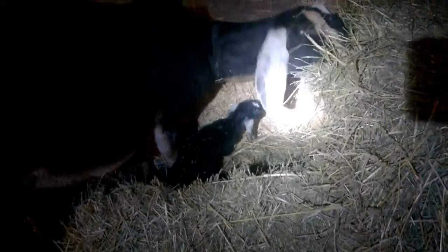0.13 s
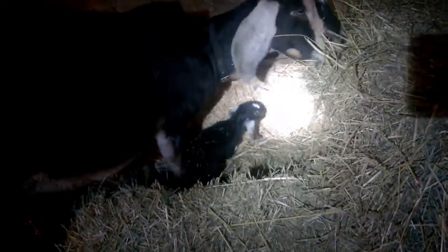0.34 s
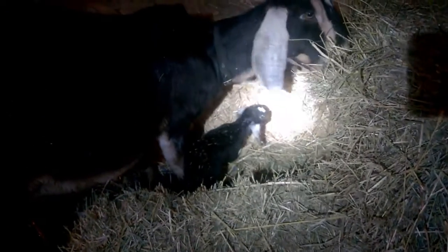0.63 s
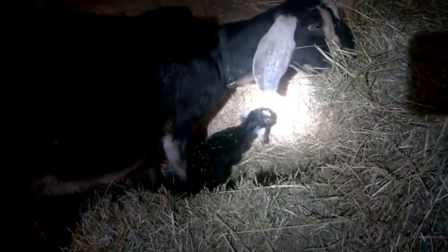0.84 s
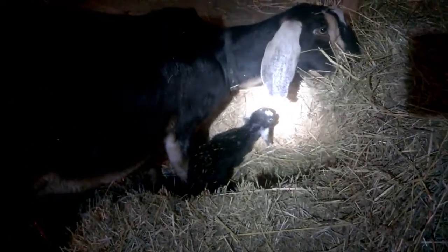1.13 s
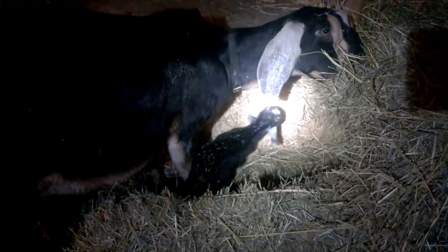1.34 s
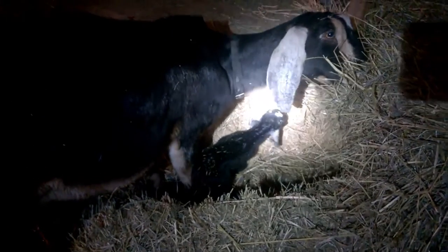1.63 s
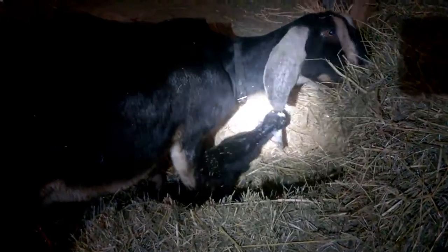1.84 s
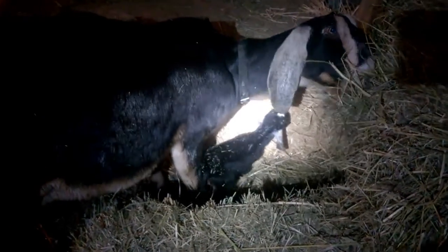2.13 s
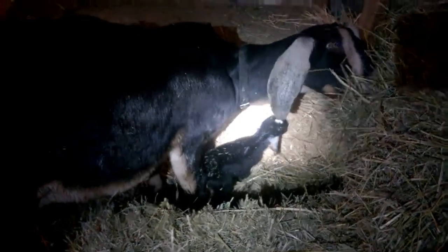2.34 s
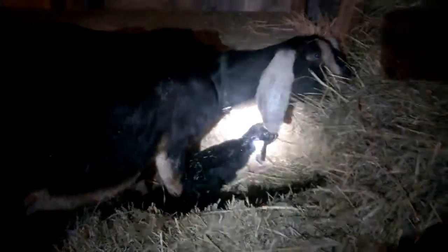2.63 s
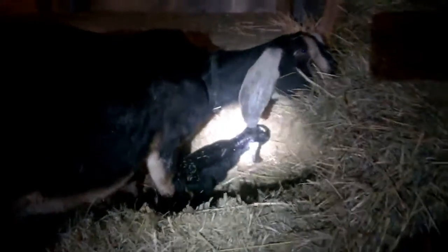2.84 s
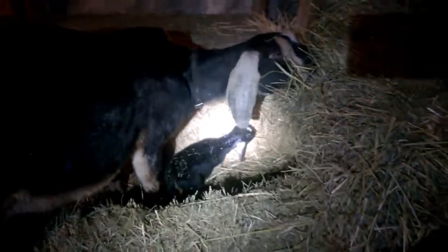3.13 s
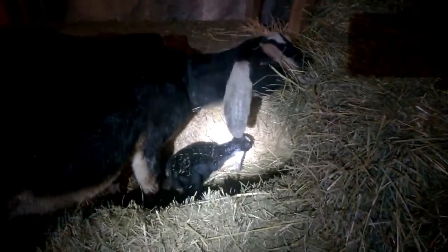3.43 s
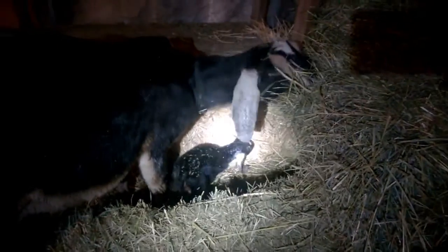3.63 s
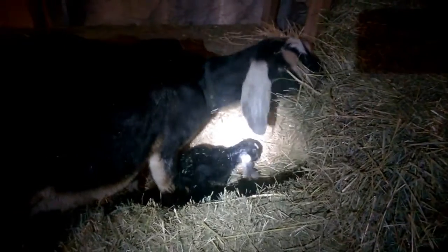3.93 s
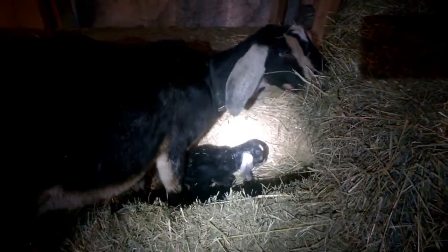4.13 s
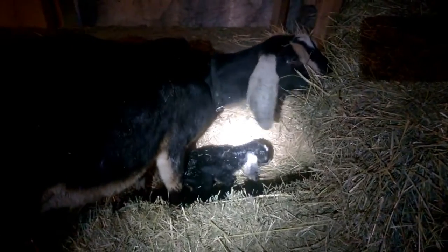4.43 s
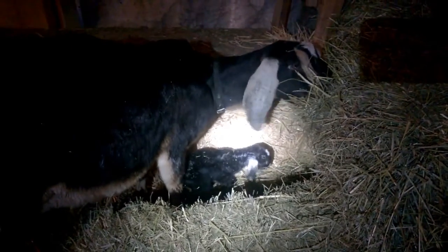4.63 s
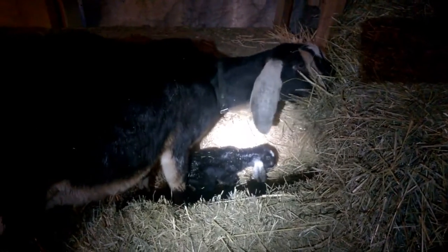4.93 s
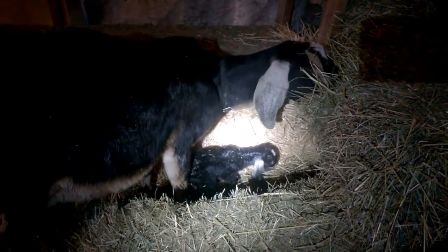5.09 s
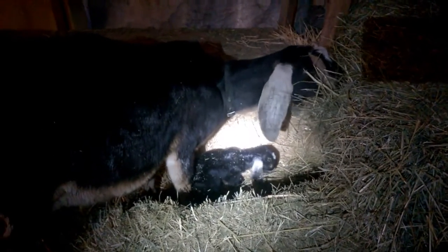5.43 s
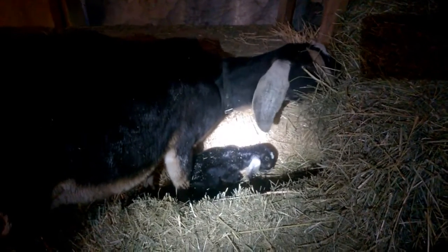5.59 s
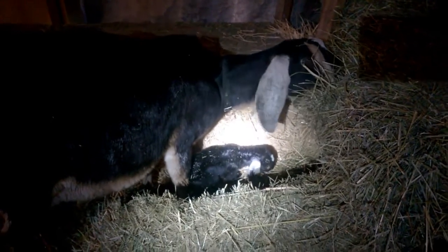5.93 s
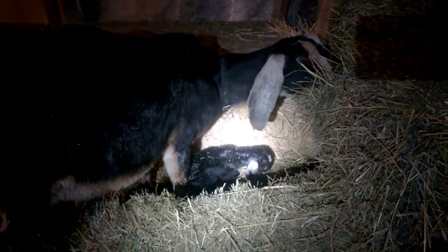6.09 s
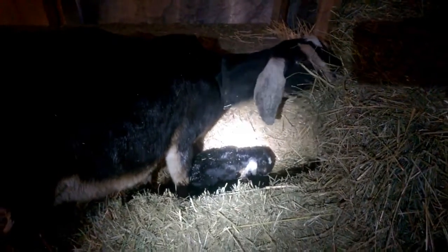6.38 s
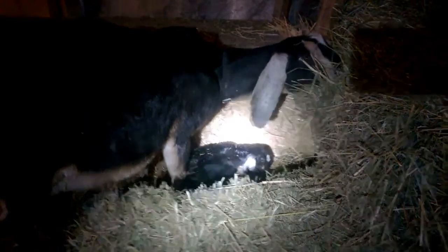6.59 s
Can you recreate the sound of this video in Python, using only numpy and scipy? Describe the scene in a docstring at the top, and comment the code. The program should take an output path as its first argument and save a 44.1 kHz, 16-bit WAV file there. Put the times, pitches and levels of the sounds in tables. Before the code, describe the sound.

Close in a quiet barn, a newborn goat kid bleats three times: a soft wavering cry, a shorter weak one, then a loud open-mouthed bleat. A hoarse, rooster-like crow sounds further off during the first two seconds. Hay rustles and snaps, straw is brushed, and small woody knocks and dull thuds mark the animals shifting. A faint low hiss continues throughout.

```python
"""Goat kid bleating in a barn

A newborn kid gives three quavering bleats, the last open-mouthed: harmonics and puffs of breath, coloured
by the mouth. Further off a hoarse, falling crow, like a rooster's: two gliding partials and a rasp of
resonant noise. Goats shift in the bedding: hay rustles and snaps (random grains), straw is swept (banded
noise), with knocks (decaying bursts) and soft thuds (low noise) over a faint steady hiss."""
import sys
import numpy as np
from scipy import signal
from scipy.fft import rfft, irfft, next_fast_len
from scipy.io import wavfile

SR = 44100
rng = np.random.default_rng(int(sys.argv[2]) if len(sys.argv) > 2 else 0)


def unload_wav(signal):
    """Save mono or channel-first audio to the path in sys.argv[1] as 16-bit WAV at rate SR, clipped to [-1, 1]."""
    wavfile.write(
        sys.argv[1],
        SR,
        np.round(np.clip(np.atleast_2d(signal).T, -1, 1) * 32767).astype(np.int16),
    )


N = 297675
TIME = np.arange(N) / SR


def from_db(db):
    """Decibels to gain."""
    return 10 ** (np.asarray(db) / 20)


def rms_one(x):
    """Scale to rms 1."""
    return x / np.sqrt(np.mean(x ** 2) + 1e-20)


def at_hz(points, hz):
    """Read a spectrum in dB on a log-frequency axis."""
    f, db = np.transpose(points)
    return np.interp(np.log(np.maximum(hz, 1)), np.log(f), db)


def coloured(x, spectrum):
    """Shape a signal by a spectrum; rms 1."""
    size = next_fast_len(N)
    gain = from_db(at_hz(spectrum, np.fft.rfftfreq(size, 1 / SR)))
    return rms_one(irfft(rfft(x, size) * gain, size)[:N])


def noise(spectrum):
    """Noise of a given colour, rms 1."""
    return coloured(rng.standard_normal(N), spectrum)


def drift(rate_hz, size=N):
    """Normal random values of spread 1, rate_hz a second, joined by straight lines."""
    return np.interp(np.arange(size) * rate_hz / SR, np.arange(size), rng.standard_normal(size))


def resonate(x, hz, width_hz):
    """Two-pole resonance, gain about 1 at its peak."""
    r = np.exp(-np.pi * width_hz / SR)
    b = np.array([1, 0, -1]) * (1 - r * r) / 2
    a = [1, -2 * r * np.cos(2 * np.pi * hz / SR), r * r]
    return signal.lfilter(b, a, x)


def bandpass(x, order, low_hz, high_hz):
    """Butterworth band-pass."""
    return signal.sosfilt(signal.butter(order, [low_hz, high_hz], "band", fs=SR, output="sos"), x)


def swell(s, half_s, t=TIME):
    """Bell of height 1 at time s, down to 1/e at half_s either side."""
    return np.exp(-np.minimum(((t - s) / half_s) ** 2, 50))


def held(start, end, attack_s, release_s, t):
    """Attack, hold at 1, release; the slopes cover 20 dB in the times given."""
    return from_db(-20 * np.clip(np.maximum((start - t) / attack_s, (t - end) / release_s), 0, 10))


def kid():
    """Three bleats, each with its own steadiness, breath and nasal dip."""
    # per bleat, one row per quaver: (crest [s], pitch [Hz], pitch arch half length [s], level [dB],
    # attack [s], release [s], mouth opening at crest [0-1])
    bleats = [
        [(1.095, 430, 0.047, -53, 0.037, 0.018, 0), (1.224, 532, 0.035, -50.5, 0.0228, .032, 0),
         (1.335, 564.4, 0.039, -43.5, 0.024, 0.026, 0.19), (1.465, 564, 0.039, -43.5, 0.038, .023, 0.25)],
        [(2.404, 417.3, .047, -52, 0.043, 0.029, 0), (2.44, 370.4, 0.0396, -60.5, 0.01, .018, 0.17),
         (2.52, 529.6, .031, -47, 0.022, 0.025, 0.21)],
        [(4.696, 438.2, 0.042, -47.5, .026, 0.023, 0), (4.796, 560, 0.038, -46, .028, 0.021, 0.06),
         (4.897, 623.5, .066, -40.5, 0.046, 0.045, 0.64), (5.006, 635.6, 0.063, -23, .024, 0.033, 0.93)],
    ]
    out = bleat(bleats[0], jitter=0.0074, shimmer=0.21, rasp_db=-17.5, bright_db_per_octave=0.5,
                dip_hz=5550, dip_width_hz=2100, dip_db=-6.5)
    out += bleat(bleats[1], jitter=0.011, shimmer=0.2, rasp_db=-12.5, bright_db_per_octave=0.44,
                 dip_hz=3500, dip_width_hz=540, dip_db=-9)
    out += bleat(bleats[2], jitter=0.0045, shimmer=0.06, rasp_db=-29.5, bright_db_per_octave=0.0,
                 dip_hz=3300, dip_width_hz=870, dip_db=-2)
    return out


def bleat(rows, jitter, shimmer, rasp_db, bright_db_per_octave, dip_hz, dip_width_hz, dip_db):
    """Harmonics whose pitch arches with each quaver; the opening mouth moves the weight up to 1.9 kHz."""
    # throat and nose with lips shut, half open, wide open: (frequency [Hz], level [dB])
    mouths = ([(400, -6), (560, -9.5), (870, 0), (1300, -8.5), (1700, -7.5), (2150, -14), (2750, -30),
               (3450, -24), (4000, -19), (5250, -18), (6500, -21), (7700, -50), (8950, -35), (9700, -44),
               (14000, -51)], [(580, 1), (1150, 5), (1550, -17), (1850, -3.5), (2350, 6.5), (3100, -6.5),
                             (3900, -10.5), (4500, -13), (5400, -31), (6250, -8.5), (7400, -35),
                             (8200, -40), (9050, -27), (9900, -39), (14000, -50)], [(620, -38.5), (1290, -20), (1690, -1.5), (1920, 1),
                                           (2200, -28.5), (2550, -16.5), (3800, -19), (4450, -23.5),
                                           (5100, -20), (5750, -27.5), (6400, -26.5), (7400, -34.5),
                                           (8500, -55), (11000, -45.5), (14500, -80)])
    waver_db = 2.6
    inside = (TIME > rows[0][0] - .12) & (TIME < rows[-1][0] + .09)
    t = TIME[inside]
    pitch_hz, level, opening, rough = quavers(rows, t)
    pitch_hz = pitch_hz * (1 + jitter * rough * drift(500)[inside])
    phase = 2 * np.pi * np.cumsum(pitch_hz) / SR
    k = np.arange(1, 33)[:, None]
    hz = k * pitch_hz
    shares = [np.interp(opening, [0, .5, 1], corner) for corner in np.eye(len(mouths))]
    throat_db = sum(share * at_hz(mouth, hz) for share, mouth in zip(shares, mouths))
    throat_db += bright_db_per_octave * np.log2(hz / 1000)
    # the side branch of the nose swallows one band
    throat_db += dip_db * np.exp(-((hz - dip_hz) / dip_width_hz) ** 2)
    # the young folds never close twice alike: each harmonic wavers by itself
    waver = np.array([drift(55.1, size=SR)[:len(t)] for _ in k])
    gains = from_db(throat_db + waver_db * waver)
    gains /= np.sqrt(np.sum(gains ** 2, axis=0) / 2)
    # the winding throat delays each harmonic differently
    lag = 2 * np.pi * rng.random(k.shape)
    voice = np.sum(gains * np.cos(k * phase - lag), axis=0)
    voice *= 1 + shimmer * rough * drift(300)[inside]
    # air escapes in a puff at every opening of the folds
    air = sum(share * noise(mouth)[inside] for share, mouth in zip(shares, mouths)) * (1 + np.cos(phase))
    out = np.zeros(N)
    out[inside] = level * (voice + from_db(rasp_db) * rough * air)
    return out


def quavers(rows, t):
    """Each push arches the pitch, swells the level and frays as it gives out; the strongest push leads."""
    pitch_sag, fall_share = 0.28, 0.77  # share of pitch lost far from the crest; fall time / rise time
    mouth_opens_per_s = 3.4
    attack_bend, release_bend = 1.25, 2.7  # 1 = straight in dB
    fray_db = 11.5  # rise in roughness over one release
    crest, top_hz, arch_s, level_db, attack_s, release_s, mouth = np.transpose(rows)[:, :, None]
    age = t - crest
    rise = np.abs(age / attack_s) ** attack_bend
    fall = np.abs(age / release_s) ** release_bend
    fade = np.where(age < 0, rise, fall)
    power = from_db(level_db - 10 * np.minimum(fade, 20)) ** 2
    lead = power / power.sum(axis=0)
    arch = swell(crest, arch_s * np.where(age < 0, 1, fall_share), t)
    pitch_hz = top_hz * (1 - pitch_sag * (1 - arch))
    opening = np.clip(mouth + mouth_opens_per_s * age, 0, 1)
    rough = from_db(fray_db * np.clip(age / release_s, 0, 1) ** 2)
    pitch_hz, opening, rough = np.sum(lead * [pitch_hz, opening, rough], axis=1)
    return pitch_hz, np.sqrt(power.sum(axis=0)), opening, rough


def echoes(x):
    """Near boards and floor favour some harmonics and cancel others as the pitch moves."""
    # reflections: (delay [s], level [dB])
    reflections = [(.0023, -26), (.0061, -15), (0.0144, -12.5)]
    return x + sum(from_db(db) * np.interp(TIME - delay_s, TIME, x, left=0) for delay_s, db in reflections)


def crow(jitter=0.0059, hoarse_jitter=0.01686, flutter_db=2.0, waver_db=3.5, dull_hz=2050):
    """A thin note of two partials, unsteady where a rattling, dulled rasp joins it."""
    # clear notes: (start [s], end [s], first pitch [Hz], last pitch [Hz], fundamental [dB], octave [dB])
    notes = [(.27, .33, 610, 624, -61.5, -65), (0.388, 0.433, 607.7, 597, -74.5, -60),
             (.605, 0.641, 867, 857.2, -53, -51), (.675, 0.711, 866, 856, -54, -47.5),
             (0.731, 0.762, 840, 826, -60, -56), (0.796, 0.793, 832, 830, -50.5, -41.5),
             (0.832, 0.962, 865, 887, -56.5, -58), (1.028, 1.117, 792, 776, -64, -57),
             (1.47, 1.501, 872.7, 868, -62, -65.5), (1.528, 1.55, 866, 858, -64.5, -50),
             (1.576, 1.67, 837.3, 802.6, -65.5, -50), (1.729, 1.8, 784.3, 735.4, -73, -48),
             (1.821, 1.871, 718, 696, -78, -62)]
    # hoarse stretches: (start [s], end [s], level [dB])
    rasps = [(0.291, 0.433, -53.5), (0.585, 0.611, -53.5), (0.718, 0.943, -54.5), (0.956, 1.123, -51),
             (1.377, 1.46, -54), (1.783, 1.81, -54.5)]
    # throat resonances of the rasp: (frequency [Hz], width [Hz], level before rms scaling [dB])
    rasp_modes = [(670, 250, -6), (696, 45, 4), (860, 110, -7.5), (1127, 143, -1), (1479, 130, 7.5),
                  (1730, 38, 0.5), (1870, 32, 5.5)]
    note_attack_s, note_release_s = 0.015, 0.05
    rasp_attack_s, rasp_release_s = 0.038, 0.11
    glide_bend = 1.09  # 1 = even glide, above = late
    t = TIME[TIME < notes[-1][1] + .5]
    rasp = np.max([from_db(db) * held(start, end, rasp_attack_s, rasp_release_s, t)
                   for start, end, db in rasps], axis=0)
    start, end, first_hz, last_hz, fundamental_db, octave_db = np.transpose(notes)[:, :, None]
    # one unbroken voice slides from each note into the next
    sounding = held(start, end, note_attack_s, note_release_s, t)
    progress = np.clip((t - start) / (end - start), 0, 1) ** glide_bend
    glides_hz = first_hz + (last_hz - first_hz) * progress
    pitch_hz = np.average(glides_hz, weights=sounding, axis=0)
    unsteady = jitter + hoarse_jitter * rasp / rasp.max()
    phase = 2 * np.pi * np.cumsum(pitch_hz * (1 + unsteady * drift(350)[:len(t)])) / SR
    note = sum(np.max(from_db(db) * sounding, axis=0) * np.sin(k * phase)
               for k, db in ((1, fundamental_db), (2, octave_db)))
    note, rasp = np.pad([note, rasp], ((0, 0), (0, N - len(t))))
    # the membranes flap chaotically and drive the throat in uneven bursts
    flaps = rng.standard_normal(N) * from_db(flutter_db * drift(160))
    throat = sum((-1) ** i * from_db(db) * resonate(flaps, hz, width_hz)
                 for i, (hz, width_hz, db) in enumerate(rasp_modes))
    throat = rms_one(bandpass(throat, 6, 480, dull_hz))
    return np.sqrt(2) * note * from_db(waver_db * drift(71.27)) + rasp * throat


def knocks(grit_db=-1.0, blow_db=22.5):
    """Each contact is a sharp blow and a dying gritty scuff: a thud, a woody ring and a crack of straw."""
    # contacts, levels ahead of the filters: (time [s], level [dB], thud [dB re level],
    # crack [dB re level], decay t60 [s])
    contacts = [(0.2, -65, -23, 18.5, 0.02), (0.831, -52.5, -11, -26, 0.12), (.886, -45.5, 2, -12, 0.14),
                (.899, -61, 8, -4, 0.17), (1.143, -50.5, -36, -7.5, 0.16), (1.798, -46.5, 0, -7, 0.13),
                (1.823, -59.5, 8, -0.5, 0.081), (1.844, -62.5, 12.5, -12, 0.11),
                (3.201, -54.5, 0.5, -19, 0.13), (3.219, -52.5, -2, -17, 0.039), (3.939, -60.5, -2, 2, .05),
                (4.021, -78, -5, 12, .04), (4.63, -56.5, 1.5, -19, 0.4), (4.861, -54, 2, -11, 0.043),
                (6.467, -65, 1, -2, 0.11), (6.573, -62, 1, -17, 0.14)]
    # woody ring: (frequency [Hz], width [Hz], relative level [dB])
    ring_modes = [(736, 1500, -14), (1500, 284, 0.5), (1612, 138, 1.5), (2280, 510, -11.5)]
    body, thud, crack = np.zeros((3, N))
    grit = rms_one(from_db(grit_db * drift(600)) * rng.standard_normal((3, N)))
    for s, level_db, thud_db, crack_db, t60_s in contacts:
        start = int(s * SR)
        age = TIME[:min(N - start, SR // 2)]
        span = slice(start, start + len(age))
        for layer, grains, db in zip((body, thud, crack), grit, (0, thud_db, crack_db)):
            layer[span] += from_db(level_db + db - 60 * age / t60_s) * grains[span]
            layer[start] += from_db(level_db + db + blow_db)
    ring = sum((-1) ** i * from_db(db + 19.5) * resonate(body, hz, width_hz)
               for i, (hz, width_hz, db) in enumerate(ring_modes))
    low = from_db(18) * resonate(resonate(thud, 418, 220), 520, 530)
    snap = bandpass(crack, 3, 2400, 6300)
    return ring + low + snap


def sweeps(grit_db=3.0):
    """A leg or muzzle sweeps through straw: gritty friction swells and fades within one band. The low stroke at
    3.19 s is a goat's short grunt, a brief swell of low noise."""
    # strokes: (time [s], half length [s], level [dB], centre [Hz], width [Hz])
    strokes = [(1.688, 0.11, -72, 4560, 1400), (2.285, 0.042, -64, 2180, 900),
               (2.316, 0.037, -58, 487, 220), (2.318, 0.035, -60.5, 1550, 450),
               (2.755, .025, -66.5, 1400, 900), (3.178, 0.049, -62, 1460, 248),
               (3.191, 0.043, -54.5, 250, 129), (3.24, 0.019, -58, 2800, 1290),
               (3.535, 0.051, -68, 2600, 1400), (4.608, 0.046, -60.5, 1760, 880),
               (5.49, 0.03, -66, 1650, 595), (5.578, 0.022, -65.5, 1520, 700),
               (6.082, 0.046, -65.5, 238, 129), (6.207, 0.16, -70, 4900, 1500),
               (6.728, 0.13, -66.5, 2470, 1400)]
    friction = rng.standard_normal(N) * from_db(grit_db * drift(370))
    out = np.zeros(N)
    for s, half_s, level_db, hz, width_hz in strokes:
        band = rms_one(resonate(resonate(friction, hz, width_hz), hz, 2 * width_hz))
        out += from_db(level_db) * swell(s, half_s) * band
    return out


def hay(snaps_per_s=5000, clump_db=2.0, rest_db=-77):
    """Dry stalks slide and snap in dense grains of uneven size, never quite still."""
    # hay pressed or brushed: (time [s], half length [s], level [dB])
    rustles = [(.24, 0.19, -68), (2.268, 0.2, -69.5), (2.54, 0.12, -64), (2.984, 0.29, -71),
               (3.234, 0.019, -67.5), (3.523, 0.24, -68), (4.003, 0.077, -63), (4.702, 0.16, -70),
               (5.486, 0.2, -72.5), (6.193, 0.25, -73), (6.744, 0.28, -66.5)]
    # stalk colour: (frequency [Hz], level [dB])
    stalk_colour = [(500, -6.5), (1000, -5), (1900, 1), (2700, -5.5), (3600, -4.5), (5200, -2.5),
                    (6400, -7), (7600, -17.5), (11000, -17.5), (15000, -25)]
    sizes = from_db(2.5 * np.minimum(rng.exponential(1, N), 4)) * rng.choice([-1, 1], N)
    grains = sizes * (rng.random(N) < snaps_per_s / SR)
    power = from_db(rest_db) ** 2 + sum((from_db(db) * swell(s, half_s)) ** 2 for s, half_s, db in rustles)
    return np.sqrt(power) * from_db(clump_db * drift(50)) * coloured(grains, stalk_colour)


def shifting():
    """Heavy bodies move on the bedding: dull thuds and low scuffs."""
    # weight shifts: (time [s], half length [s], thud [dB], scuff [dB])
    shifts = [(2.37, 0.024, -85, -61.5), (2.733, 0.087, -62.5, -67.5), (3.197, 0.05, -67, -65),
              (3.406, 0.064, -53.5, -67.5), (3.52, .11, -57.5, -80), (3.773, 0.057, -73, -59.5),
              (4.122, 0.071, -66.5, -90), (4.623, 0.044, -90, -64.5), (4.9, 0.041, -68, -66),
              (5.59, 0.089, -71, -69), (6.095, 0.035, -67, -84.5), (6.617, 0.18, -68.5, -77)]
    weight = sum(from_db(thud_db) * swell(s, half_s) for s, half_s, thud_db, _ in shifts)
    scuff = sum(from_db(scuff_db) * swell(s, half_s) for s, half_s, _, scuff_db in shifts)
    thuds = weight * noise([(20, -4), (45, 6.5), (70, -0.5), (140, -3.0), (220, -8), (450, -41), (1000, -70.5)])
    scuffs = scuff * noise([(100, -2), (240, 1.0), (420, -0.5), (700, -10), (1500, -26.0), (4000, -41)])
    return thuds + scuffs


def hiss(level_db=-60.5):
    """Steady noise, strongest in the lows, with a faint hiss above."""
    # colour: (frequency [Hz], relative density [dB per Hz])
    air_colour = [(12, -37), (20, 3), (36, -10.5), (103, -22.5), (175, -24), (238, -25), (282, -26),
                  (324, -29), (519, -31), (631, -32), (881, -35), (2900, -40), (5300, -38), (7520, -52.5),
                  (15500, -48.5)]
    return from_db(level_db) * noise(air_colour)


def barn(x, wet_db, t60_s, first_s=0.00997, wall_hz=6000):
    """Boards send back a short tail, a decaying noise, that the hay soon swallows."""
    age = TIME[:SR // 2]
    tail = rng.standard_normal(len(age)) * from_db(-60 * age / t60_s) * (age > first_s)
    tail /= np.sqrt(np.sum(tail ** 2))
    tail = signal.sosfilt(signal.butter(1, min(wall_hz, SR / 3), fs=SR, output="sos"), tail)
    return x + from_db(wet_db) * signal.fftconvolve(x, tail)[:N]


def scene():
    """Kid and bedding close by, the crow further off, hiss under it all."""
    voice = barn(echoes(kid()), wet_db=-10.0, t60_s=0.19)
    bedding = barn(knocks() + sweeps() + hay(), wet_db=-10, t60_s=0.16)
    far = barn(crow(), wet_db=-7.5, t60_s=0.52)
    return (voice + bedding + far + shifting() + hiss())[None]


def record(dry, cutoff_hz=15550):
    """Steep elliptic low-pass."""
    return signal.sosfilt(signal.ellip(10, .1, 70, cutoff_hz, fs=SR, output="sos"), dry)


dry = scene()
out = record(dry)
unload_wav(out)
```